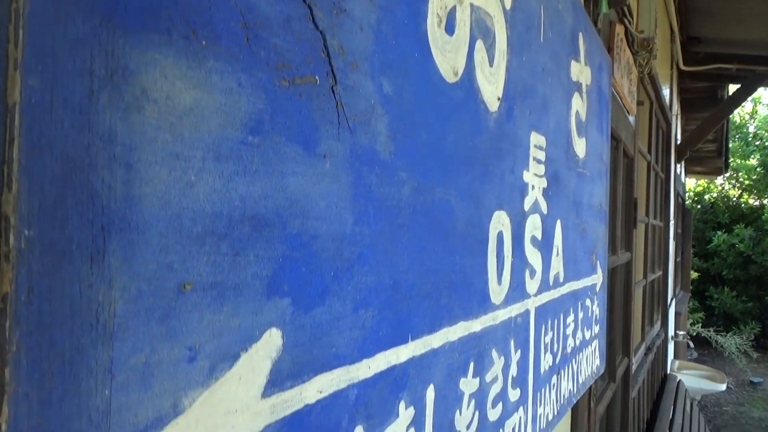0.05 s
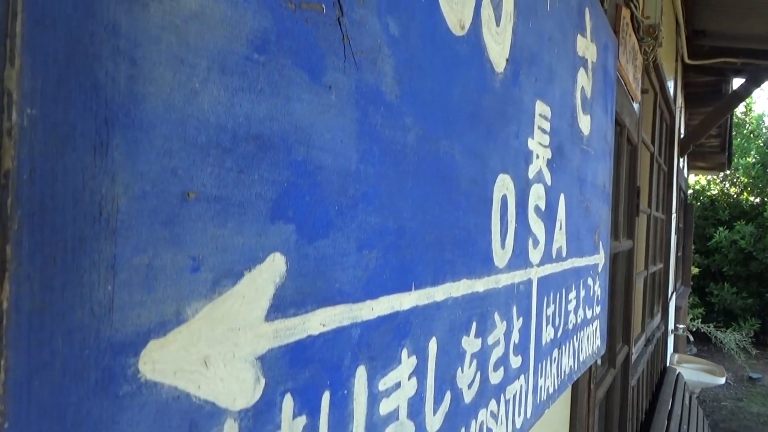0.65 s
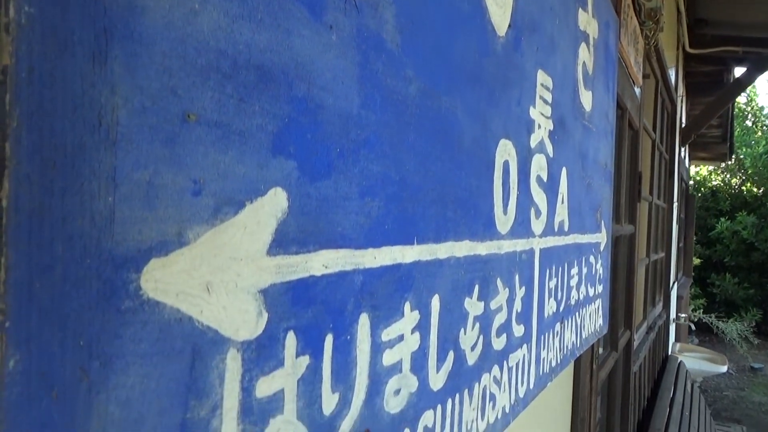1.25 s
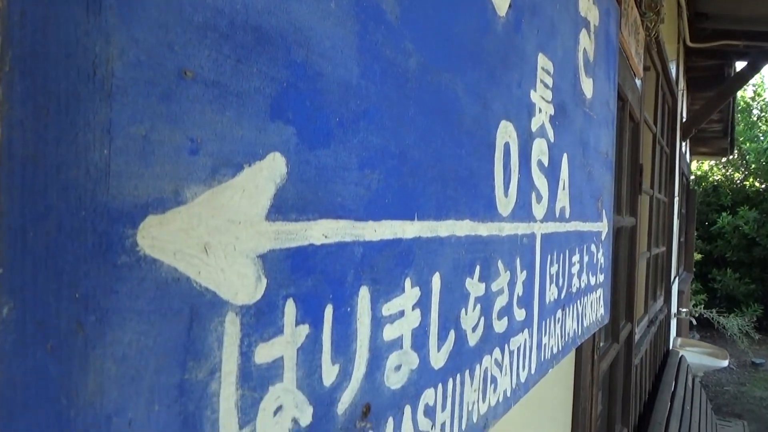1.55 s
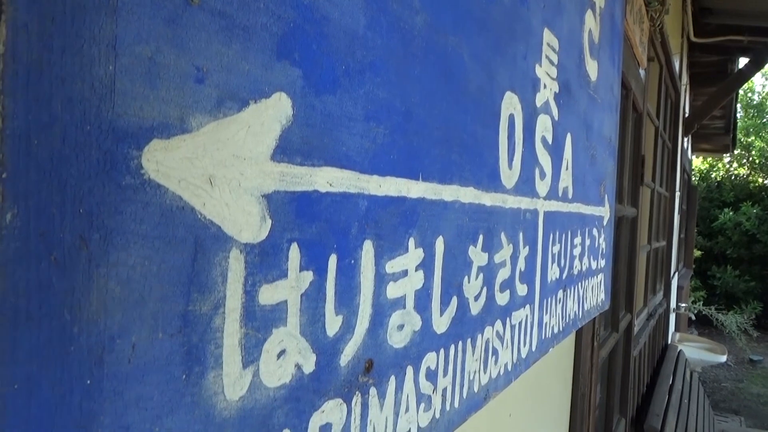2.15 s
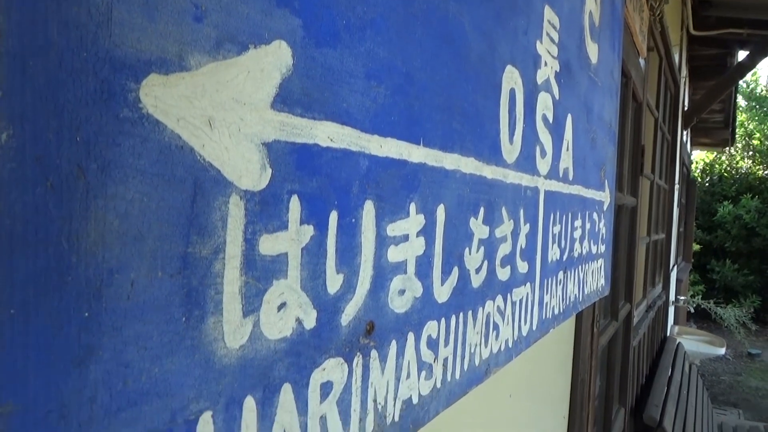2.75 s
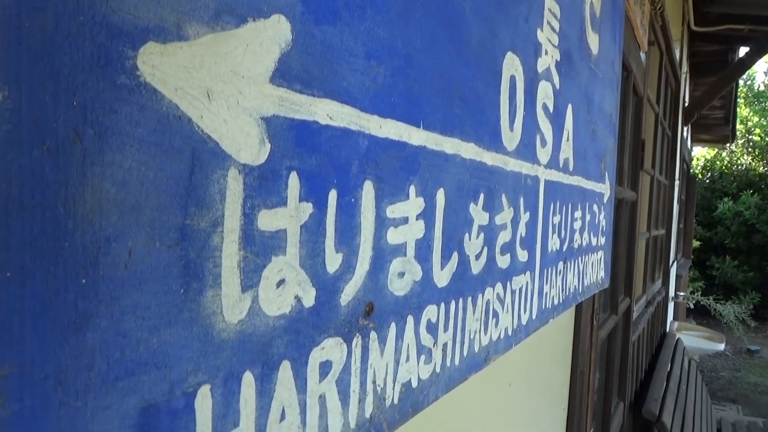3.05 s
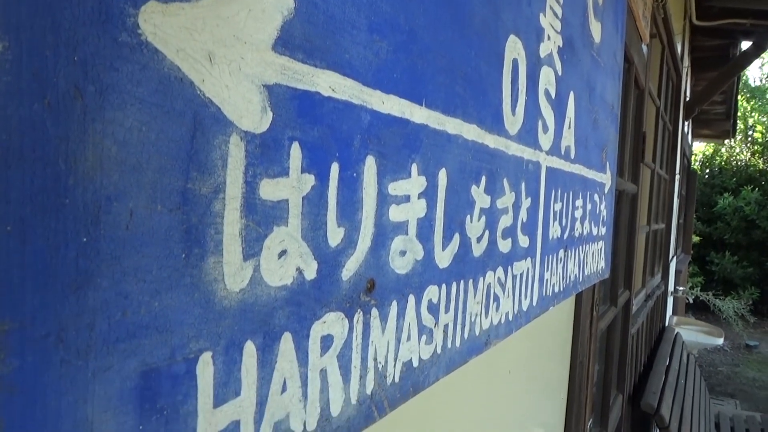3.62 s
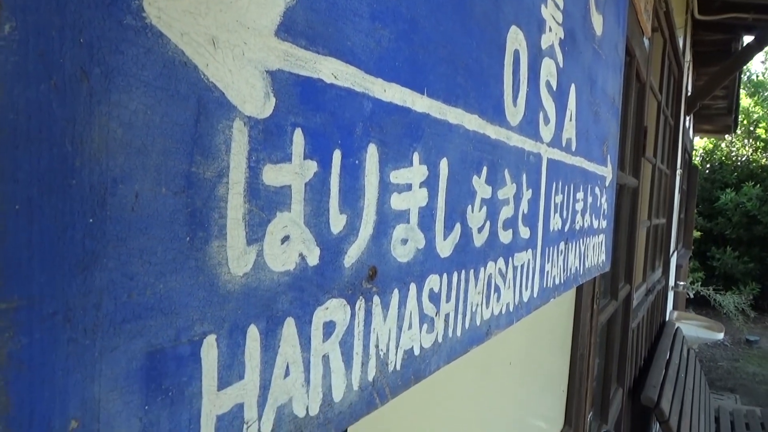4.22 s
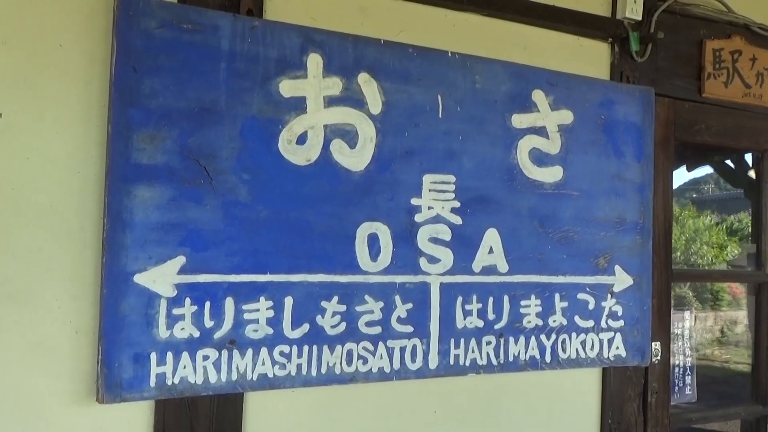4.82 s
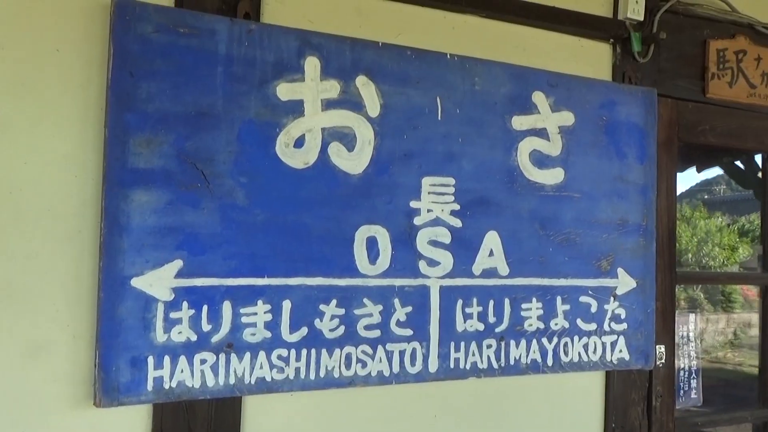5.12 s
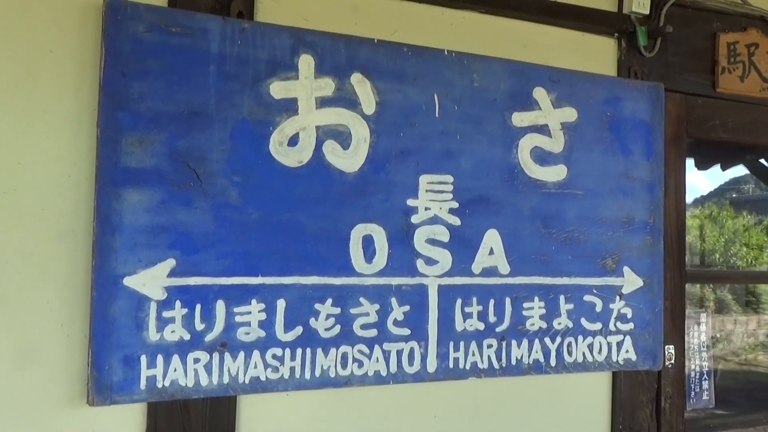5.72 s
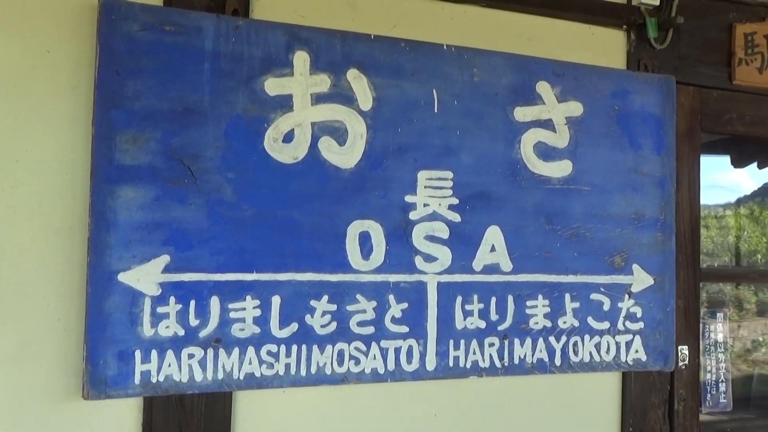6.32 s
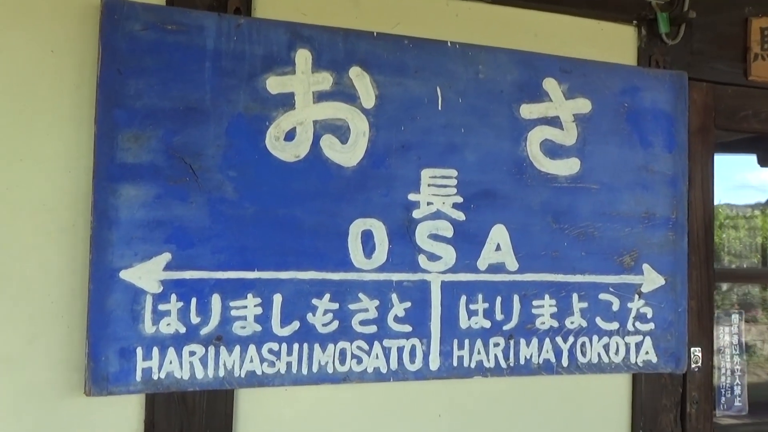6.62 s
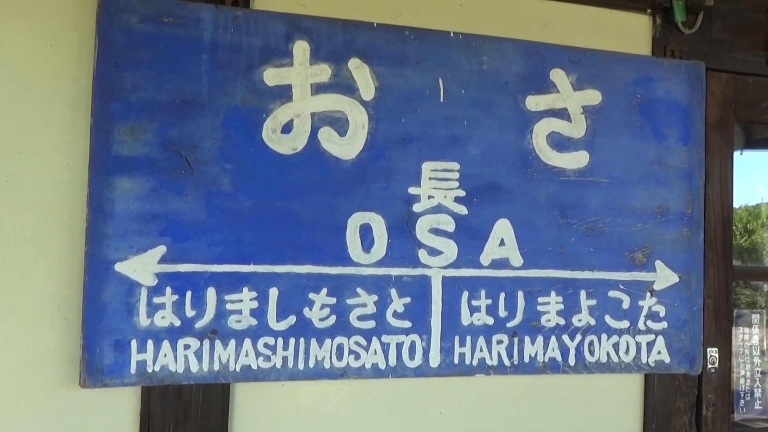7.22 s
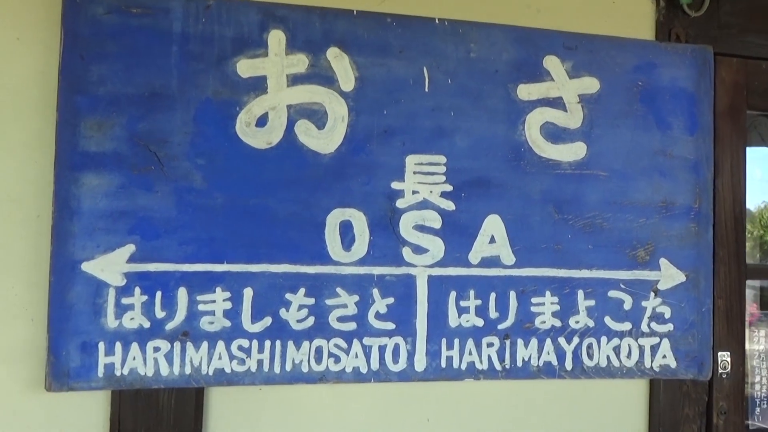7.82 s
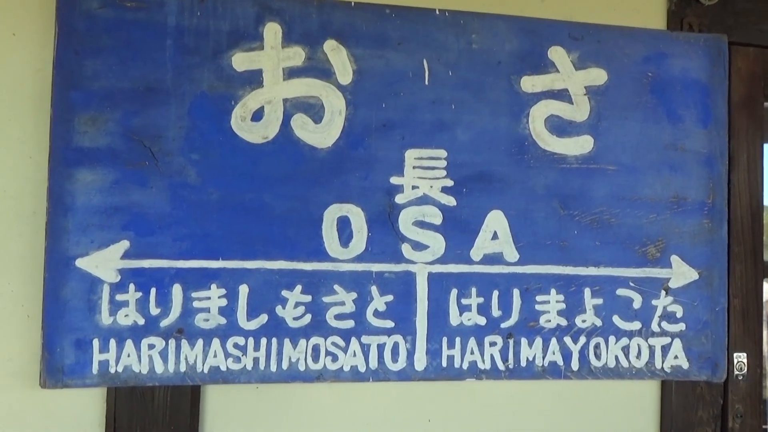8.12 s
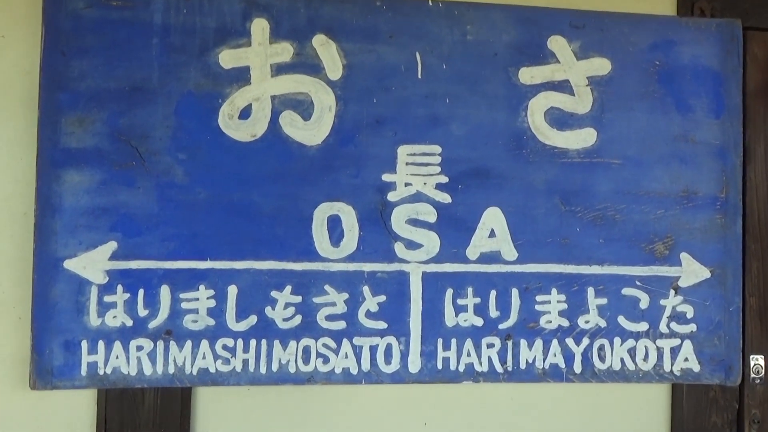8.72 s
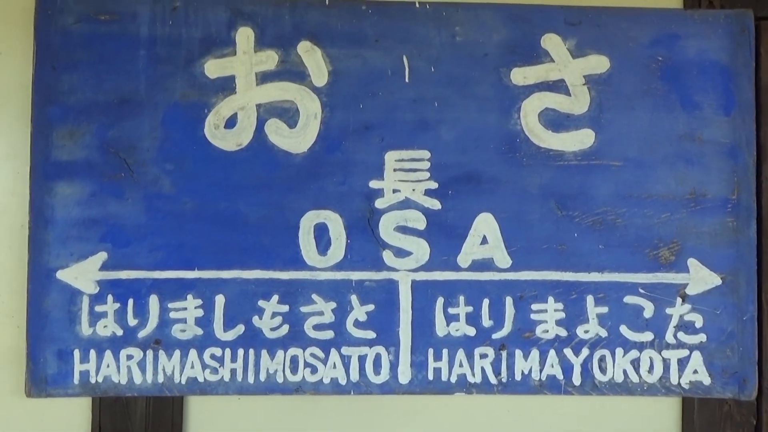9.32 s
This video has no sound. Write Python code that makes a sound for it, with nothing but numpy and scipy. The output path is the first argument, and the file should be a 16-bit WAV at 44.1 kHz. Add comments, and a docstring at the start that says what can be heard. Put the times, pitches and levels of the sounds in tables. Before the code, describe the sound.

A diesel railcar approaches a small station, heard from beside the wooden building. The rails sing faintly and wheels clank over joints while a rolling roar swells and moves to the right, the engine humming underneath. Brakes begin to grind. About halfway through, a loud, piercing wheel squeal rises and the roar drops away. The squeal holds its pitch, fluttering and throbbing to the end, with short lower chirps and a few more knocks.

```python
"""Small station, beside the wooden building: a diesel railcar rolls in and passes to the right.
The rails sing ahead of it, wheels clank over joints, and the roar of rough treads swells as each
bogie draws level. Faint whistles come and go; brake blocks grind. Stick-slip makes a braked wheel
squeal near 5 kHz among the walls, lower wheel modes chirp in, and the engine idles."""
import sys
import numpy as np
from scipy import signal
from scipy.fft import rfft, irfft, next_fast_len
from scipy.io import wavfile
from scipy.ndimage import uniform_filter1d, minimum_filter1d, map_coordinates

SR = 44100
rng = np.random.default_rng(int(sys.argv[2]) if len(sys.argv) > 2 else 0)


def persist_wave(psi):
    """Save psi, clipped to +-1, as 16-bit WAV."""
    counts = np.round(np.clip(psi, -1, 1) * 32767).astype(np.int16)
    wavfile.write(sys.argv[1], SR, np.atleast_2d(counts).T)


N = 417186

# rolling noise (time [s], level [dB])
ROLL_DB = [(0, -30.5), (0.7, -27.5), (1.1, -25.5), (1.85, -27), (2.45, -24), (2.8, -21.5), (3.15, -21),
           (3.35, -18), (3.6, -20.5), (4.3, -19), (5.2, -21), (5.33, -27.5), (5.5, -32), (5.72, -39),
           (6.3, -35.5), (8.4, -36), (9.46, -33.5)]
# bogies drawing level (time [s], length [s], nearness [1 = alongside])
BOGIES = [(3.91, 0.48, 0.7), (4.79, 1, 0.92), (7.52, 0.85, 1), (9.346, 0.56, 0.43)]
# brief low rumbles (time [s], length [s], level [dB])
BUMPS = [(0.12, 0.11, -44), (0.687, 0.14, -33.5), (2.88, 0.2, -39), (5.256, 0.12, -28), (7.062, 0.11, -36)]
# rolling spectra (frequency [Hz], relative density [dB])
RUMBLE_SPECTRUM = [(15, -20), (28, -18), (42, -14), (55, -4), (75, -1.5), (110, -17), (250, -71)]
BOOM_SPECTRUM = [(45, -31), (75, -16.5), (110, -4.5), (160, -1), (205, 3.5), (255, -1.5), (310, -5.5),
                 (420, -14.5), (900, -63)]
ROAR_SPECTRUM = [(150, -35), (250, -1.5), (320, 1.5), (380, -1), (450, 0.5), (530, -3.5), (640, -6),
                 (760, -4.5), (880, -8), (1020, -12.5), (1400, -25.5), (2200, -45), (6000, -66)]
HISS_SPECTRUM = [(3000, -30), (5000, -13), (6000, 3.5), (7600, 1), (9000, -5), (11000, -7.5),
                 (13000, -15.5), (15000, -15)]
# rail song (time [s], level [dB])
SONG_DB = [(0, -33), (1.6, -31), (2.1, -27.5), (2.6, -30.5), (3.45, -30), (5.2, -43), (5.6, -71),
           (7.45, -39), (8.4, -48.5), (9.46, -41)]
# rail resonances (frequency [Hz], half-width [Hz], relative level [dB])
RAIL_MODES = [(1149, 88, 5), (1390, 470, -2), (2048, 91, 2), (2270, 210, -9), (2554, 140, 0),
              (2980, 270, -5), (3350, 230, -1), (3770, 250, -10.5), (4140, 270, -5), (4430, 190, -7),
              (4930, 470, -8.5), (7300, 1300, -16)]
# spits of hiss (time [s], length [s], level [dB])
SPITS = [(7.45, 0.14, -48), (8.84, 0.032, -40), (9.27, 0.07, -48)]
# diesel (time [s], firing tone [dB], exhaust drone [dB])
ENGINE_DB = [(0, -47, -47), (1.7, -41, -43.5), (2.2, -37, -42), (4.9, -40, -45), (5.6, -47, -43),
             (6.8, -48, -48), (7.5, -35, -37), (8.4, -42, -41), (9.46, -37, -48.5)]
# engine orders (multiple of firing rate, relative level [dB])
ORDERS_DB = [(1, -3.5), (2, -0.5), (3, -19)]
# exhaust drone (frequency [Hz], relative density [dB])
DRONE_SPECTRUM = [(50, -22), (85, -4.5), (115, 1), (160, -5.5), (240, -15), (500, -56)]
# wheels striking joints (time [s], level [dB], clang offset [dB])
JOINT_HITS = [(.672, -20, -19), (0.901, -15, 1), (0.917, -15, -18), (.967, -16, -15), (.986, -14.5, -25),
              (1.115, -30, 2), (1.132, -32, 11), (1.2, -17, -10.5), (1.222, -13, -31), (1.249, -26, -25),
              (1.465, -20, -22), (1.689, -18, -22), (2.659, -13, -30), (3.295, -13.5, -21),
              (3.706, -31, -23), (3.999, -14.5, -3.5), (4.299, -16.5, 0), (6.266, -23, -2.5),
              (6.294, -26.5, -30), (6.651, -22.5, -14)]
# joint impact spectra (frequency [Hz], relative density [dB])
THUD_SPECTRUM = [(40, -25), (130, -3.5), (230, -1.5), (330, -5.5), (480, 0), (600, -4), (720, -8),
                 (900, -13), (1300, -25), (3000, -26.5), (9000, -66)]
CLANG_SPECTRUM = [(400, -28), (900, 9), (1600, -4.5), (2550, 4), (3200, -14), (5000, -27), (11000, -34),
                  (16000, -47)]
# faint rings and whistles (time [s], length [s], frequency [Hz], half-width [Hz], level [dB])
WHISTLES = [(2.797, 1, 2086, 11, -43), (3.447, .28, 14300, 350, -52), (3.807, 0.96, 3270, 480, -34),
            (4.26, 0.69, 2620, 200, -32), (4.795, 0.16, 2420, 87, -25), (6.874, .07, 2470, 14, -40),
            (8.873, 0.085, 7450, 31, -50), (8.944, 0.039, 2620, 36, -35), (9.303, 0.02, 2100, 90, -35),
            (8.72, 0.28, 2500, 66, -46), (9.097, 0.9, 12652, 55, -58)]
# brake block rub (frequency [Hz], relative density [dB])
RUB_SPECTRUM = [(500, -37), (1000, -4), (1400, 2.5), (2000, 3.5), (2550, 3.5), (3000, 0.5), (3700, -3.5),
                (4400, -1), (5800, -5), (7500, -9.5), (9000, -15), (11000, -16), (13000, -23.5),
                (15000, -31)]
# squealing wheel (time [s], level [dB], reflected share [0-1], overtone offset [dB])
SQUEAL_TRACK = [(4.8, -37, 0.2, -43), (5.05, -29.5, 0.27, -41), (5.28, -15.5, 0.38, -42),
                (5.6, -12.5, 0.83, -23.5), (6.4, -17, 0.36, -27), (7.35, -19.5, 0.6, -22),
                (7.85, -21.5, 0.78, -24), (8.05, -24, 0.25, -28.5), (8.6, -17.5, 0.56, -18),
                (8.92, -17.5, 0.37, -16.5), (9.46, -25.5, 0.62, -21.5)]
# squeal pitch (time [s], frequency [Hz])
SQUEAL_HZ = [(5.1, 4972), (5.35, 4915), (5.75, 4868), (6.0, 4908), (6.95, 4905), (7.15, 4945), (7.45, 4908),
             (8.8, 4910), (8.92, 4893)]
# reflections of the moving wheel (frequency [Hz], relative density [dB])
SCATTER_SPECTRUM = [(3800, -77), (4070, -27.5), (4220, -35.5), (4600, -32.5), (4750, -16), (4840, -4),
                    (4900, 3), (4960, -5.5), (5070, -12), (5170, -22.5), (5300, -30), (5550, -44),
                    (5750, -28), (6100, -64)]
# squeal throbs, louder and purer (time [s], length [s], boost [dB])
SURGES = [(6.702, 0.022, 2), (6.88, 0.054, 5), (7.065, 0.02, 1), (8.161, 0.015, 8), (8.477, 0.02, 6.5),
          (8.558, 0.026, 8), (8.688, 0.031, 10), (8.755, 0.027, 6.5), (8.815, 0.034, 6), (9.335, 0.046, 8),
          (9.391, 0.04, 7)]
# squealing wheel moving across (time [s], left minus right [dB])
LEAN_DB = [(5, 0), (5.5, -3.5), (8.3, -4.5), (9.3, 2)]
# wheel chirps (time [s], length [s], level [dB])
CHIRPS = [(5.897, 0.051, -30.5), (5.977, 0.04, -35.5), (6.055, 0.049, -30.5), (6.131, 0.061, -30.5),
          (6.223, 0.041, -27.5), (6.27, 0.046, -35), (6.613, 0.036, -35.5), (6.66, 0.031, -28),
          (6.715, 0.12, -38), (7.224, 0.091, -32), (8.634, 0.063, -43), (8.765, 0.084, -40.5),
          (8.94, 0.032, -38), (9.02, 0.11, -40)]
# chirp resonances (frequency [Hz], half-width [Hz], relative level [dB])
CHIRP_MODES = [(2270, 98, -4.5), (2645, 38, 3.5), (6570, 49, -15), (7086, 98, -4), (7450, 120, -8)]
# stereo likeness of the noise (frequency [Hz], left-right correlation [0-1])
COHERENCE = [(60, 0.68), (130, 0.94), (290, 0.99), (640, 0.99), (1100, 0.84), (1500, 0.88), (2400, 0.95),
             (4500, 1), (7000, 0.97), (11000, 0.98)]
# car bearing (time [s], shift to the right [0-1])
BEARING = [(0, 0.04), (1.5, 0.5), (3, 0.77), (5, 1)]
# stereo image of the car, early and late (frequency [Hz], left minus right [dB], left lead [rad])
EARLY_IMAGE = [(40, -1, 0.1), (90, -1.5, 0.5), (180, -1.5, 0.5), (350, -4.5, 0.47), (700, -4.5, 0.37),
               (1300, -3, 1), (2800, -2, 0.35), (5000, -1.5, 0.48), (9000, -1.5, 0)]
LATE_IMAGE = [(90, -1.8, 0.085), (180, -0.5, 0.12), (350, -1.8, 0.12), (700, -3, 0.3), (1300, -4.5, 0.39),
              (2800, -3, 0.57), (7000, -2.5, 0.45), (11000, -2, 0.03)]
# the stereo image shifts and the bass centres (time [s], blend from early to late [0-1])
IMAGE_BLEND = [(5.2, 0), (5.5, 1)]

# layers (offset from rolling level [dB], boost with a bogie alongside [dB])
RUMBLE_DB, BOOM_DB, ROAR_DB = (-20.5, 3.5), (-5, 7.5), (0, 0.5)
HISS_DB, RUB_DB = (-20, 2.5), (-5.5, 3)


def amp(db):
    """Decibels to gain."""
    return 10 ** (np.asarray(db) / 20)


def unit(x):
    """Scale to rms 1."""
    return x / np.sqrt(np.mean(np.abs(x) ** 2) + 1e-20)


def along(points, hz):
    """Interpolate (frequency [Hz], value) points on a log axis."""
    knots_hz, values = np.transpose(points)
    return np.interp(np.log(hz + 1), np.log(knots_hz + 1), values)


def curves(rows):
    """One value per sample for each column after the time."""
    times_s, *columns = np.transpose(rows)
    return [np.interp(np.arange(N) / SR, times_s, column) for column in columns]


def wobble(rate_hz):
    """Smooth random curve, rms 1."""
    knots = rng.standard_normal(2 ** 13)
    return unit(map_coordinates(knots, [np.arange(N) * rate_hz / SR], mode="wrap"))


def swell(centre_s, length_s):
    """Flat-topped rise and fall."""
    return 1 / (1 + (2 * (np.arange(N) / SR - centre_s) / length_s) ** 4)


def swells(rows):
    """Gain curve from (time [s], length [s], level [dB]) rows."""
    return sum(amp(db) * swell(s, length_s) for s, length_s, db in rows)


def filtered(x, response):
    """Apply a frequency response."""
    size = next_fast_len(N + SR // 4)
    return irfft(rfft(x, size) * response(np.fft.rfftfreq(size, 1 / SR)), size)[..., :N]


def colour(points):
    """Response from (frequency [Hz], level [dB]) points."""
    return lambda hz: amp(along(points, hz))


def resonant(modes):
    """Response of independent resonances."""
    return lambda hz: np.sqrt(sum(amp(db) ** 2 / (1 + ((hz - centre_hz) / half_hz) ** 2) ** 2
                                  for centre_hz, half_hz, db in modes))


def rush(response, patchy_db):
    """Coloured stereo noise, rms 1, with patches of random strength."""
    def mid_side(hz):
        angle = np.arccos(np.clip(along(COHERENCE, hz), -1, 1)) / 2
        return response(hz) * np.array([np.cos(angle), np.sin(angle)])

    frames = signal.stft(rng.standard_normal((2, N)), nperseg=512)[2]
    patches = uniform_filter1d(uniform_filter1d(rng.standard_normal(frames.shape[1:]), 7, 0), 9, 1)
    pair = signal.istft(frames * amp(patchy_db * unit(patches)), nperseg=512)[1][:, :N]
    mid, side = filtered(pair, mid_side)
    return unit(np.array([mid + side, mid - side]))


def placed(x, image):
    """Left-right level and phase difference per frequency."""
    image, sides = np.array(image), np.array([[0.5], [-0.5]])
    level_db, lead_rad = image[:, :2], image[:, ::2]
    return filtered(x, lambda hz: amp(sides * along(level_db, hz))
                    * np.exp(1j * sides * along(lead_rad, hz)))


def wheel_db(offset_db, near_db):
    """Layer level: follows the rolling noise, rises as each bogie draws level."""
    roll_db, = curves(ROLL_DB)
    nearness = sum(near * swell(s, length_s) for s, length_s, near in BOGIES)
    return roll_db + offset_db + near_db * nearness


def ambience(level_db=-52.5):
    """Faint, steady rumble of the surroundings."""
    return amp(level_db) * rush(colour(RUMBLE_SPECTRUM), patchy_db=2.5)[0]


def rolling():
    """Rough treads shake ground, car body and wheels."""
    shake = amp(wheel_db(*RUMBLE_DB) + 1.2 * wobble(15)) + swells(BUMPS)
    rumble = shake * rush(colour(RUMBLE_SPECTRUM), patchy_db=1.0)
    boom = amp(wheel_db(*BOOM_DB) + 0.74 * wobble(7)) * rush(colour(BOOM_SPECTRUM), patchy_db=1.63)
    roar = amp(wheel_db(*ROAR_DB) + 0.31 * wobble(30)) * rush(colour(ROAR_SPECTRUM), patchy_db=1.25)
    return rumble + boom + roar


def rails(far_db=-12, near_s=2.1):
    """Rail resonances carry wheel noise ahead; the treads hiss, weaker while far off."""
    song_db, = curves(SONG_DB)
    distance_db, = curves([(0, far_db), (near_s, 0)])
    song = amp(song_db) * rush(resonant(RAIL_MODES), patchy_db=1.27)
    hiss_gain = amp(wheel_db(*HISS_DB) + distance_db) + swells(SPITS)
    return song + hiss_gain * rush(colour(HISS_SPECTRUM), patchy_db=2.0)


def engine(firing_hz=68):
    """Idling diesel: firing-rate harmonics over exhaust drone, mono."""
    hum_db, drone_db = curves(ENGINE_DB)
    phase = 2 * np.pi * np.cumsum(firing_hz * (1 + 0.0057 * wobble(6.5))) / SR
    hum = sum(amp(hum_db + db + 1.3 * wobble(4.5)) * np.sin(order * phase) for order, db in ORDERS_DB)
    return hum + amp(drone_db) * rush(colour(DRONE_SPECTRUM), patchy_db=3.0)[0]


def joints(thud_t60_s=0.15, clang_t60_s=0.15, crack_t60_s=0.033, rise_s=0.0013):
    """Wheels drop on joints: a thud, a steel crack, a clang dying along the platform."""
    t = np.arange(SR // 2) / SR
    thud_gain, clang_gain = np.zeros((2, N + SR))
    ring = amp(-6.5 - 60 * t / crack_t60_s) + amp(-3.0 - 60 * t / clang_t60_s)
    for s, db, clang_db in JOINT_HITS:
        start = round(s * SR)
        blow = amp(db) * (1 - np.exp(-t / rise_s))
        thud_gain[start:start + len(t)] += blow * amp(-60 * t / thud_t60_s)
        clang_gain[start:start + len(t)] += blow * amp(clang_db) * ring
    thud = thud_gain[:N] * rush(colour(THUD_SPECTRUM), patchy_db=1.5)
    clang = clang_gain[:N] * rush(colour(CLANG_SPECTRUM), patchy_db=2)
    return thud + clang


def whistles(waver_db=1.0):
    """Narrow steel-like tones swell, waver and fade."""
    tones = np.zeros(N)
    for s, length_s, hz, half_hz, db in WHISTLES:
        waver = amp(waver_db * wobble(9))
        band = filtered(rng.standard_normal(N), resonant([(hz, half_hz, 0)]))
        tones += amp(db) * swell(s, length_s) * unit(waver * band)
    return tones


def brakes(on_s=3.05, full_s=4.35, off_db=-19.5):
    """Blocks grind on the turning treads; the rub builds up."""
    press_db, = curves([(on_s, off_db), (full_s, 0)])
    rub_db = wheel_db(*RUB_DB) + press_db + 0.85 * wobble(21) + 1.2 * wobble(160)
    return amp(rub_db) * rush(colour(RUB_SPECTRUM), patchy_db=1.5)


def squeal(jitter_hz=11, spread=0.43, fade_db=1.7, flutter_db=1.74,
           onset_db_per_s=90, lead_rad_per_db=0.08):
    """Stick-slip locks one wheel mode; a noise band of Doppler-shifted reflections beats with it."""
    level_db, reflected, overtone_db = curves(SQUEAL_TRACK)
    pitch_hz, = curves(SQUEAL_HZ)
    onset_db = onset_db_per_s * np.minimum(np.arange(N) / SR - SQUEAL_TRACK[0][0], 0)
    surge = amp(sum(db * swell(s, length_s) for s, length_s, db in SURGES))
    reflected = np.clip(reflected / surge, 0.02, 0.98)
    direct = np.exp(2j * np.pi * np.cumsum(pitch_hz + jitter_hz * wobble(35)) / SR)
    band = filtered(rng.standard_normal((2, N)), colour(SCATTER_SPECTRUM))
    mid, side = signal.hilbert(band, next_fast_len(N))[:, :N]
    scattered = unit(np.array([mid + spread * side, mid - spread * side]))
    # near walls: loud and soft spots sweep over each channel
    fading = unit(amp(fade_db * np.array([wobble(30), wobble(30)])))
    tone = np.sqrt(1 - reflected) * direct * fading + np.sqrt(reflected) * scattered
    # the squeal's loudness stays even through the beats
    power = uniform_filter1d(np.mean(np.abs(tone) ** 2, 0), size=4000)
    tone = tone / np.sqrt(np.abs(power) + 1e-6)
    tone = tone * surge * unit(amp(flutter_db * wobble(28)))
    # overtones take their own paths and fade separately
    halo_modes = [(9750, 68, 6.5), (9920, 60, 8), (9700, 700, -7.5), (14720, 140, -19)]
    halo = rush(resonant(halo_modes), patchy_db=2.5)
    harmonics = np.real(direct ** 2 + amp(-8) * direct ** 3) * unit(amp(2.5 * wobble(40)))
    overtones = amp(overtone_db) * (0.32 * harmonics + 0.78 * halo)
    lean_db, = curves(LEAN_DB)
    side_db = np.array([lean_db, -lean_db]) / 2
    tone = tone * amp(side_db) * np.exp(1j * lead_rad_per_db * side_db)
    return amp(level_db + onset_db) * (np.sqrt(2) * tone.real + overtones)


def chirps():
    """Lower wheel modes catch briefly; bands near 7 kHz stand for sum tones with the squeal."""
    return swells(CHIRPS) * rush(resonant(CHIRP_MODES), patchy_db=-2.5)


def scene():
    """The car comes from ahead and passes to the right; the stereo image shifts and the bass centres."""
    car = rolling() + rails() + brakes() + engine() + joints() + chirps() + whistles()
    bearing, = curves(BEARING)
    blend, = curves(IMAGE_BLEND)
    early = car + bearing * (placed(car, EARLY_IMAGE) - car)
    placed_car = early + blend * (placed(car, LATE_IMAGE) - early)
    return placed_car + squeal() + ambience()


def record(dry, treble_hz=3500, threshold=0.45, top_hz=15150):
    """A limiter ducks everything on treble peaks; a low-pass follows."""
    treble = np.abs(filtered(dry, lambda hz: hz > treble_hz)).max(0)
    needed_gain = np.minimum(1, threshold / (treble + 1e-9))
    gain = uniform_filter1d(minimum_filter1d(needed_gain, size=500), size=300)
    return filtered(dry * gain, lambda hz: hz < top_hz)


dry = scene()
out = record(dry)
persist_wave(out)
```